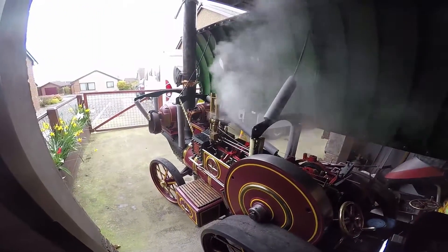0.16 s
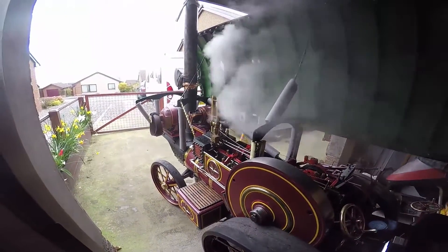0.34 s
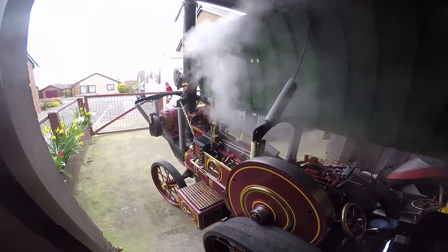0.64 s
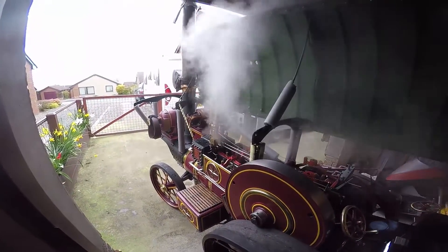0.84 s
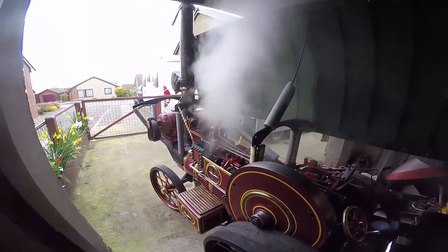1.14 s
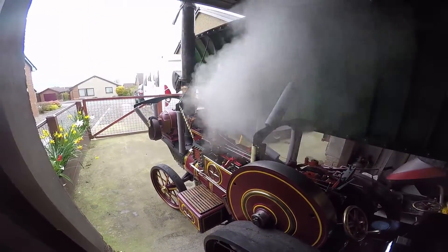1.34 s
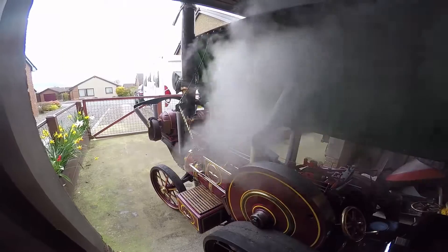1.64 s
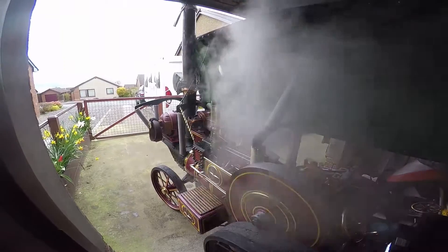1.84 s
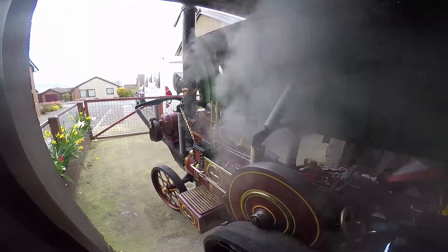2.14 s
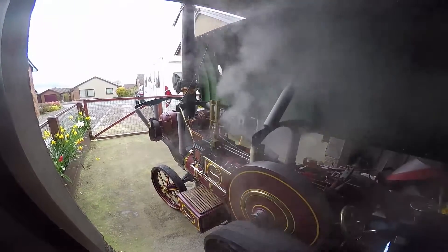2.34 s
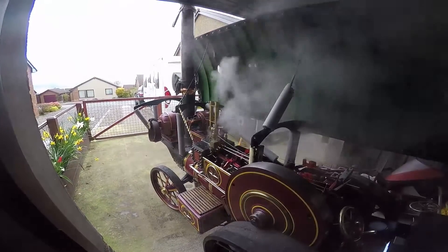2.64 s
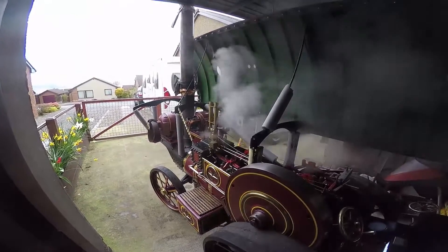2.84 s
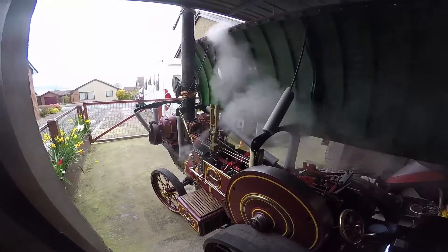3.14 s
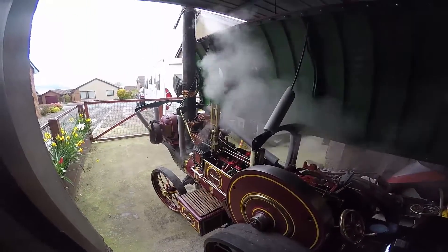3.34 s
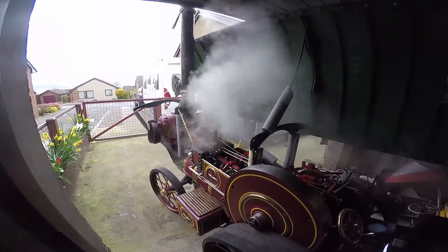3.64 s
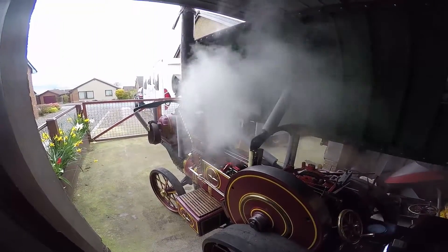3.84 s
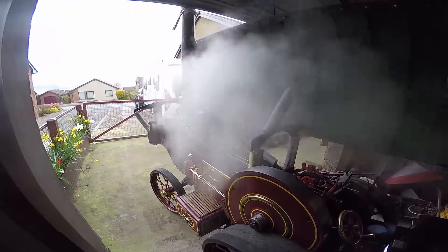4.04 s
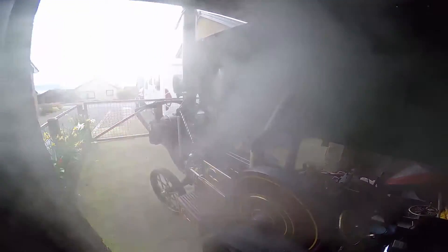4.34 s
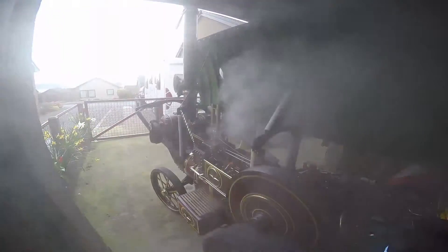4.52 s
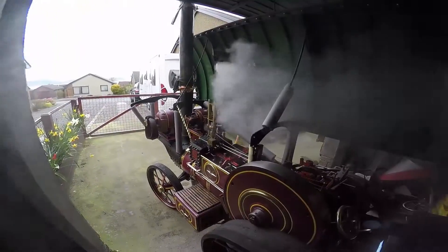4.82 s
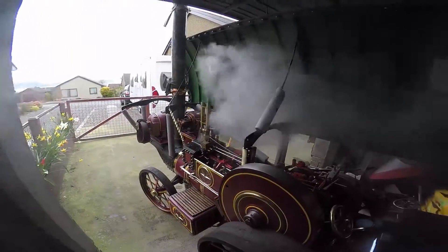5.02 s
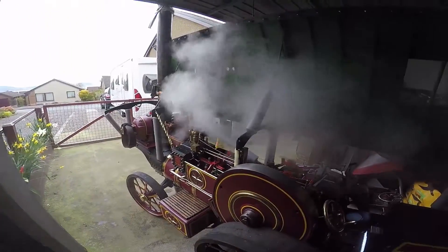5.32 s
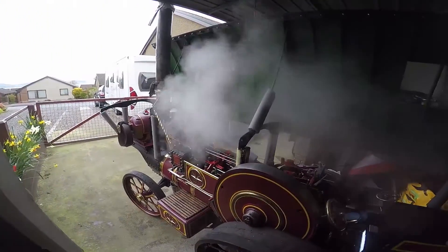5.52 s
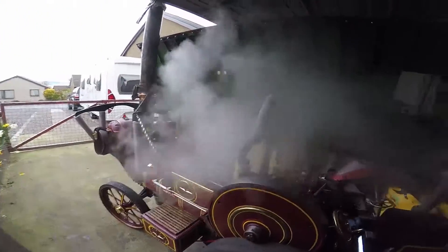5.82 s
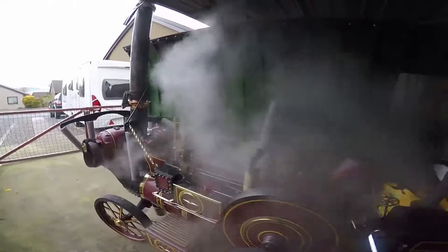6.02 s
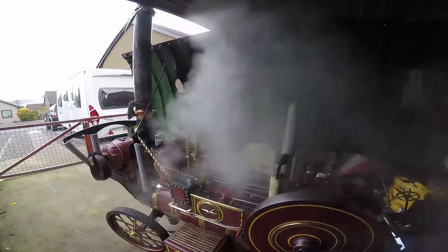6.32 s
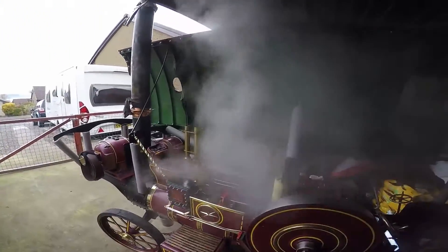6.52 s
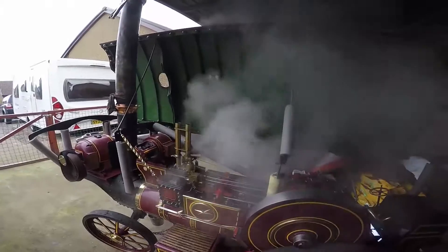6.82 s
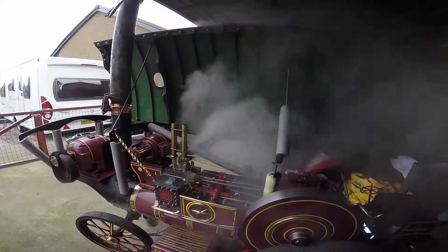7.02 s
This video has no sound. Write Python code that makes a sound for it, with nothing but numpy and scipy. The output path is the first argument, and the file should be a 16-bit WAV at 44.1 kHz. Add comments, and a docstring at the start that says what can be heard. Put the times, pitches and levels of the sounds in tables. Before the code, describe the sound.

Steam roars continuously from a steam engine's safety valves in an open metal shed, a loud steady hiss with faint fuzzy whistling tones.

```python
"""Steam roars out of a steam engine's safety valves inside an open metal shed, close to two microphones.
The jet is shaped white noise; it rings the valve pipes and the shed, giving fuzzy whistling bands.
Late on the microphones move to a new spot, where the bands and the stereo picture differ.
Underneath, low-passed lumpy noise is the air softly buffeting the microphones."""
import sys
import numpy as np
from scipy import signal
from scipy.io import wavfile
from scipy.ndimage import uniform_filter1d

SR = 44100
rng = np.random.default_rng(int(sys.argv[2]) if len(sys.argv) > 2 else 0)


def persist_wave(psi):
    """Save psi, clipped to +-1, as 16-bit WAV."""
    counts = np.round(np.clip(psi, -1, 1) * 32767).astype(np.int16)
    wavfile.write(sys.argv[1], SR, np.atleast_2d(counts).T)


N = 316015  # length in samples

# bare jet hiss at each spot, before trim and stereo lean: f/Hz, level per Hz/dB
HISS_FIRST = [(110, -86), (150, -60), (300, -72.5), (750, -88.5), (950, -56), (1600, -67.5), (2600, -60.5),
              (4000, -60), (6000, -53.5), (7500, -56.5), (8300, -62.5), (11000, -71), (14000, -72),
              (15000, -76)]
HISS_SECOND = [(110, -68), (150, -60.5), (300, -66), (750, -68), (950, -51), (1600, -76), (2600, -59),
               (4000, -56), (6000, -53), (7500, -61), (8300, -62.5), (11000, -70.5), (14000, -70.5),
               (15000, -83)]
# pipe and shed resonances at each spot: f/Hz, width scale/Hz, left level per Hz/dB, right level per Hz/dB
RINGS_FIRST = [(182, 140, -72, -71.5), (410, 59, -71.5, -63), (566, 65, -70.5, -61.5),
               (656, 230, -75.5, -62.5), (727, 17.5, -69, -59), (1106.6, 82.5, -56, -43),
               (1392, 103, -57.5, -63), (1576, 71, -66.5, -55), (1746, 28, -53.5, -70),
               (2154, 173, -48.5, -48.5), (2570, 47, -66, -59), (2826, 43, -53, -59), (3046, 50, -72, -49),
               (3044, 46, -63, -52), (3256, 167, -53, -54.5), (3557, 56, -57, -55),
               (3864, 69, -51.5, -62.5), (4090, 83, -59, -49), (4225, 74, -54, -50.5),
               (4520, 99, -50.5, -57), (4850, 51, -70, -59), (4930, 148, -49, -55.5),
               (5450, 120, -69, -52.5), (5755, 140, -56.5, -51.5), (5980, 170, -50, -59),
               (6140, 42, -48.5, -47.5), (7440, 72, -58, -61), (6620, 210, -55, -68),
               (7050, 160, -58, -56.5), (7340, 110, -64, -62), (7740, 65, -88, -89)]
RINGS_MIDWAY = [(663, 75, -76, -59.5), (1110, 28, -45, -47), (1286, 44, -58, -50), (1470, 55, -55, -54.5),
                (1610, 64, -66, -63), (2010, 190, -49, -50.5), (2324, 140, -50, -51), (3210, 320, -55, -52),
                (4100, 76, -46, -47.5), (4390, 155, -55, -52), (4900, 210, -52.2, -52),
                (5250, 99, -49, -58), (5750, 360, -53, -52.5), (6200, 130, -56, -54), (6660, 120, -53, -57),
                (7090, 290, -53.5, -53.5)]
RINGS_SECOND = [(610, 82, -80, -59.5), (1130, 82, -52.5, -63), (1270, 190, -55.5, -52.5),
                (1760, 68, -53, -53.5), (1990, 43, -64, -65), (2197, 122, -43, -46), (2440, 226, -65, -60),
                (3180, 120, -48, -47), (3950, 208, -55, -55), (4190, 110, -52, -52),
                (4780, 160, -54, -53.2), (5060, 79, -53.3, -53), (5180, 140, -55, -54.5),
                (5500, 110, -54, -55), (6030, 241, -52, -58), (7170, 740, -57, -55.5)]
# stereo picture at the two microphone ports: f/Hz, hiss left minus right/dB, likeness/0-1, right leads/rad
PORTS_FIRST = [(150, -3.2, .98, -.02), (420, -8.6, .98, -.5), (620, -10.9, .82, -3.2),
               (800, -10.3, .3, -6.8), (1100, -7.5, .88, -6.93), (1300, -.3, .5, -8.75),
               (1420, -.8, .93, -12.7), (2850, -2, .7, -12.45), (3700, 0, .96, -12.55),
               (5000, .8, .62, -11.95), (7700, -1.5, .55, -10.0), (9000, -10, .15, -11.0),
               (11500, -9.8, .16, -13.3), (14000, -3.1, .3, -12.56)]
PORTS_SECOND = [(150, -3.1, .98, -.01), (420, -8.7, .98, -.59), (620, -14.1, .91, -2.88),
                (800, -6.9, .81, -2.2), (1100, 4.2, .5, -4.61), (1300, -4.3, .77, -6.0),
                (1600, -1.5, .75, -6.83), (2600, 0, .9, -6.3), (3800, 0, .97, -6.25), (5000, .5, .65, -6.0),
                (7000, -1, .25, -4.5), (9000, -10, .15, -3.9), (11500, -10.2, .13, -7.12),
                (14000, -3.2, .36, -6.34)]
# sliding narrow whistles inside the two lowest pipe tones: t/s, f/Hz, level per Hz before lean/dB
WHISTLE_LOW = [(0, 1082, -45.5), (1.5, 1116, -48), (5.0, 1108, -44.5), (5.3, 1114, -43.5),
               (5.85, 1125, -41.5), (6.1, 1115, -52)]
WHISTLE_HIGH = [(0, 2065, -49.5), (4.6, 2160, -51), (5.3, 2096, -45), (5.75, 2100, -57), (5.95, 2210, -60),
                (6.15, 2270, -47), (6.5, 2220, -46), (6.72, 2250, -47), (7.17, 2250, -49)]
# moments when a pipe tone swells or sags: t/s, f/Hz, half length/s, level change/dB
SWELLS = [(0.0, 1110, 0.072, 4.5), (0.0, 2100, 0.16, -4), (1.25, 4850, 0.25, 1.5), (1.25, 6000, .3, 2.5),
          (2.2, 3230, .3, 2), (2.5, 5940, .7, -2.3), (3.9, 5000, 0.41, 2.7), (3.9, 6040, 0.47, 2.3),
          (5.1, 4930, .3, 0), (5.246, 3230, 0.29, 3), (5.35, 2250, 0.22, -2.5), (5.95, 4220, .2, 2),
          (.6, 3200, 0.95, -1)]
# buffeting that dies down and comes back, before gusts and port lean: t/s, level/dB
BUFFET_LEVEL = [(0, -38), (.5, -40.5), (1.1, -50), (2.7, -64), (3.8, -58), (4.6, -42), (5.8, -38.5),
                (7.17, -36.5)]
# spectrum of the buffeting, only its shape counts: f/Hz, relative level per Hz/dB
BUFFET_COLOUR = [(10, -6), (25, 4), (45, -3), (76, 8.5), (110, -1), (135, -5), (220, -14), (270, -18),
                 (390, -38)]
# the strongest gusts: t/s, level above the buffeting/dB
GUSTS = [(.2, 8), (.66, 1), (5.17, 5.5), (6.03, 1), (6.31, 3), (6.76, 5)]

MOVE_START_S, MOVE_END_S = 5.46, 6.83  # the midway spot is passed at half time
# the shed's boom grows, then holds
BOOM_HZ, BOOM_HALF_HZ = 166, 50
BOOM_START_DB, BOOM_FULL_DB, BOOM_GROWS_S = -7, 3.5, 4.5
SWELL_HALF_HZ, GUST_HALF_S = 230, 0.032
EDGE_HZ = 15170  # upper band limit

# time-frequency grid: window and hop in samples
SIZE, HOP = 2048, 256
HZ = np.fft.rfftfreq(SIZE, 1 / SR)[:, None]
TIMES = np.arange(-(-N // HOP) + 1) * HOP / SR


def steam():
    """A turbulent jet heard from a moving standpoint, its pipe tones swelling and its hiss flickering."""
    spots = [
        spot(HISS_FIRST, RINGS_FIRST, PORTS_FIRST),
        spot(HISS_SECOND, RINGS_MIDWAY, PORTS_SECOND),
        spot(HISS_SECOND, RINGS_SECOND, PORTS_SECOND),
    ]
    # crossfade: place 0 is the first spot, 1 midway, 2 the second
    place = np.interp(TIMES, [MOVE_START_S, MOVE_END_S], [0, 2])
    shares = [np.clip(1 - abs(place - k), 0, 1) for k in range(3)]
    power = sum(share * spot_power for share, (spot_power, _) in zip(shares, spots))
    likeness = sum(share * spot_likeness for share, (_, spot_likeness) in zip(shares, spots))
    power = power + whistle(WHISTLE_LOW, 35, lean_db=0.5)
    power = power + whistle(WHISTLE_HIGH, 53, lean_db=1.0)
    no_bass = 1 / (1 + (140 / (HZ + 1)) ** 16)  # the jet has nothing below the shed's boom
    motion_db = boom_and_swells() + echoes() + flicker()
    return port_pair(power * no_bass * gain_of(motion_db) ** 2, likeness)


def spot(hiss, rings, ports):
    """Power at both ports and their complex likeness at one spot: bare jet plus steep resonances."""
    half_lean_db = read(ports, 1) / 2
    hiss_db = read(hiss, 1) - 2.0 + np.array([half_lean_db, -half_lean_db])
    power = gain_of(hiss_db) ** 2
    for hz, width, *port_db in rings:
        shape = 1 / (1 + 2.2 * ((HZ - hz) / width) ** 2) ** 2
        power = power + gain_of(np.reshape(port_db, (2, 1, 1))) ** 2 * shape
    return power, read(ports, 2) * np.exp(1j * read(ports, 3))


def whistle(rows, width, lean_db):
    """A narrow resonance that slides in pitch; after its last row it fades at 40 dB per second."""
    shape = 1 / (1 + 3.1 * ((HZ - follow(rows, 1)) / width) ** 2) ** 2
    level_db = follow(rows, 2) - 40 * np.maximum(TIMES - rows[-1][0], 0)
    port_lean_db = np.reshape([lean_db, -lean_db], (2, 1, 1))
    return shape * gain_of(level_db + port_lean_db) ** 2


def boom_and_swells():
    """Level changes in dB: the shed's boom grows and single pipe tones swell or sag."""
    growth = np.minimum(TIMES / BOOM_GROWS_S, 1)
    boom_db = BOOM_START_DB + (BOOM_FULL_DB - BOOM_START_DB) * growth
    drift_db = boom_db * bump(HZ, BOOM_HZ, BOOM_HALF_HZ)
    for s, hz, half_s, db in SWELLS:
        drift_db = drift_db + db * bump(HZ, hz, SWELL_HALF_HZ) * bump(TIMES, s, half_s)
    return drift_db


def echoes():
    """Drifting steam bends the shed's echoes, so narrow bands wax and wane, in dB."""
    shared_db = 1.69 * patches(45, 0.68)
    each_port_db = 0.49 * np.array([patches(70, 0.32), patches(70, 0.51)])
    ripple_db = 1.42 * patches(22, 2.9)  # fine standing-wave ripple, nearly still
    bending = 0.57 + 0.68 * HZ ** 2 / (HZ ** 2 + 2500 ** 2)  # long waves are bent least
    return (shared_db + each_port_db + ripple_db) * bending


def flicker():
    """Gusty turbulence flickers the hiss in dB, strongest in the treble, with a slow treble heave."""
    treble = 1 / (1 + (7500 / (HZ + 1)) ** 6)
    quick_db = (0.49 + 0.44 * treble) * patches(2900, 0.025)
    heave_db = 0.5 * treble * patches(11000, 0.38)
    return quick_db + heave_db


def buffet():
    """Low lumpy air pressure on both ports, stronger on the right and least alike in the deepest bass."""
    colour = gain_of(read(BUFFET_COLOUR, 1)) ** 2
    colour = colour / (colour.sum() * SR / SIZE)  # unit total power
    gusts_db = sum(db * bump(TIMES, s, GUST_HALF_S) for s, db in GUSTS)
    lumps_db = 0.95 * patches(60, 0.048) + 1.25 * patches(400, 0.05)
    port_lean_db = np.reshape([-1.4, 1.4], (2, 1, 1))
    level_db = follow(BUFFET_LEVEL, 1) + gusts_db + lumps_db + port_lean_db
    likeness = np.clip(0.21 + 0.77 * HZ ** 4 / (HZ ** 4 + 36 ** 4), 0, 1)
    return port_pair(colour * gain_of(level_db) ** 2, likeness)


def port_pair(power, likeness):
    """Filters white noise to a power per Hz for each port; likeness is the complex left-right correlation."""
    noise = rng.standard_normal((N, 2)).T
    left, stray = signal.stft(noise, nperseg=SIZE, noverlap=SIZE - HOP)[2]
    unlike = np.sqrt(np.clip(1 - abs(likeness) ** 2, 0, 1))
    pair = np.array([left, likeness * left + unlike * stray])
    shaped = pair * np.sqrt(power * SR / 2)
    return signal.istft(shaped, nperseg=SIZE, noverlap=SIZE - HOP)[1][:, :N]


def patches(wide_hz, long_s):
    """Random blotches over frequency and time, twice smoothed to a size and scaled to spread 1."""
    field = rng.standard_normal((len(TIMES), len(HZ))).T
    bins = max(round(wide_hz * SIZE / SR), 1)
    frames = max(round(long_s * SR / HOP), 1)
    for _ in range(2):
        field = uniform_filter1d(field, bins, axis=0)
        field = uniform_filter1d(field, frames, axis=1)
    return field / field.std()


def bump(x, centre, half):
    """A bell of height 1, down to 1/e at the half length."""
    return np.exp(-((x - centre) / half) ** 2)


def read(points, column):
    """A table column over log frequency."""
    points = np.array(points)
    return np.interp(np.log(HZ + 1), np.log(points[:, 0] + 1), points[:, column])


def follow(rows, column):
    """A table column over time."""
    rows = np.array(rows)
    return np.interp(TIMES, rows[:, 0], rows[:, column])


def gain_of(db):
    """Decibels to amplitude."""
    return 10 ** (np.asarray(db) / 20)


def scene():
    """Steam jet over buffeting air."""
    return steam() + buffet()


def record(dry):
    """The recorder's band limit: a steep linear-phase low-pass."""
    low_pass = signal.firwin(1023, EDGE_HZ, window=("kaiser", 9), fs=SR)
    return signal.oaconvolve(dry, low_pass[None], "same")


dry = scene()
out = record(dry)
persist_wave(out)
```